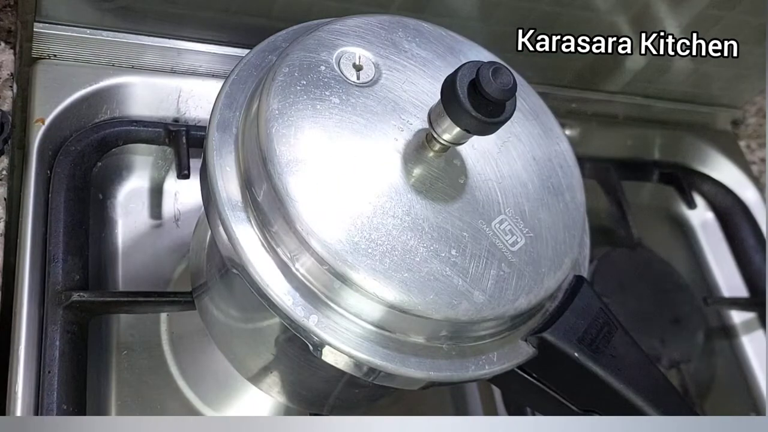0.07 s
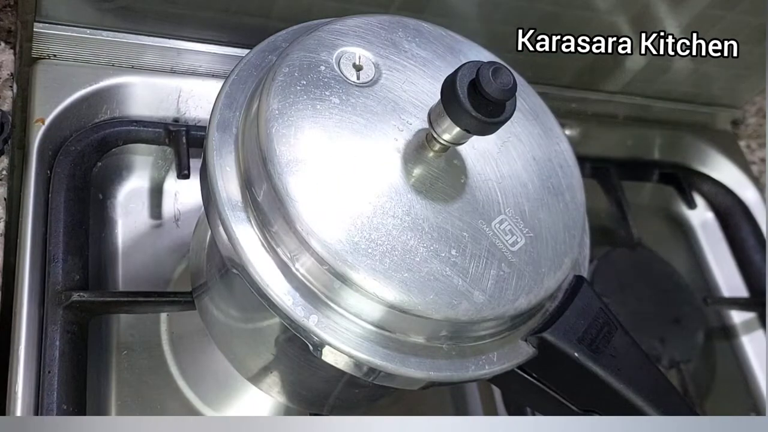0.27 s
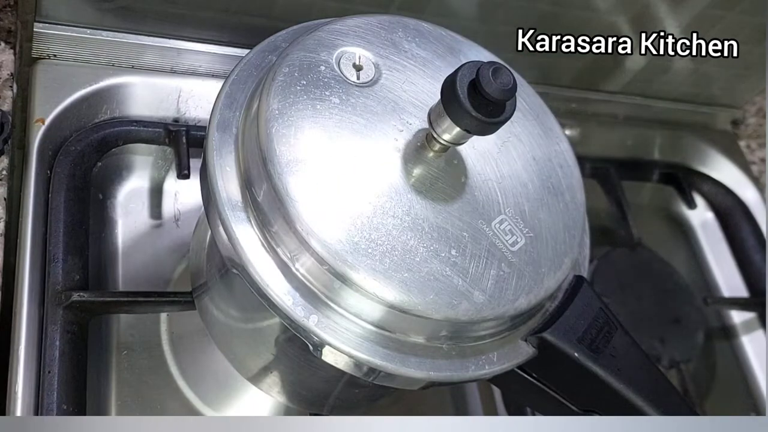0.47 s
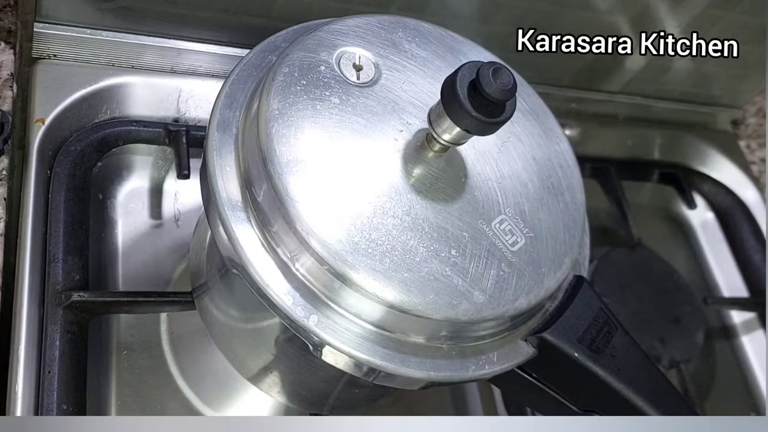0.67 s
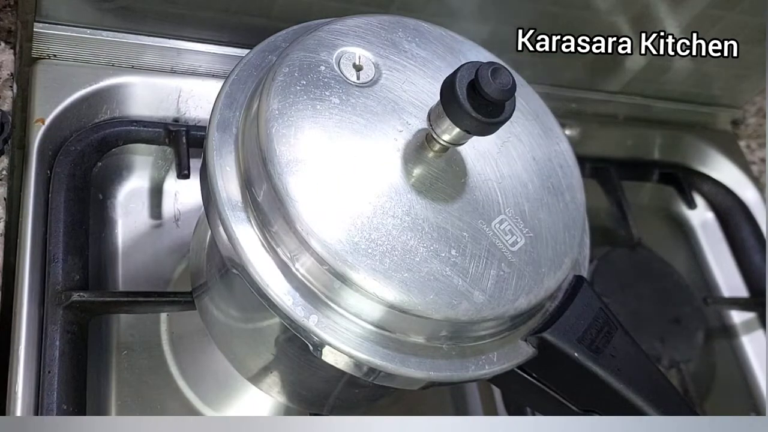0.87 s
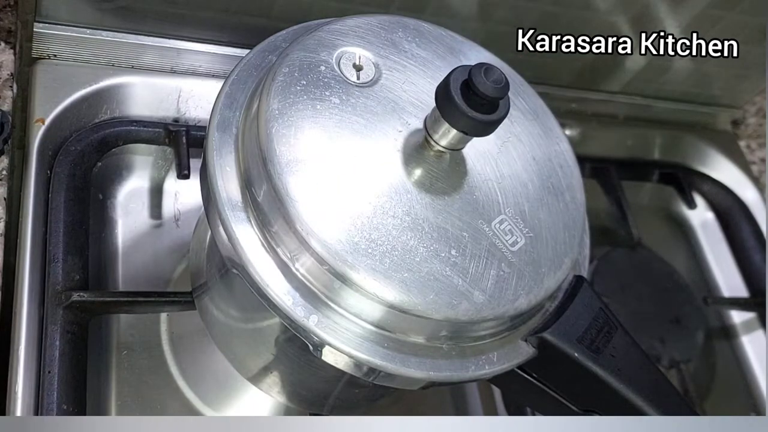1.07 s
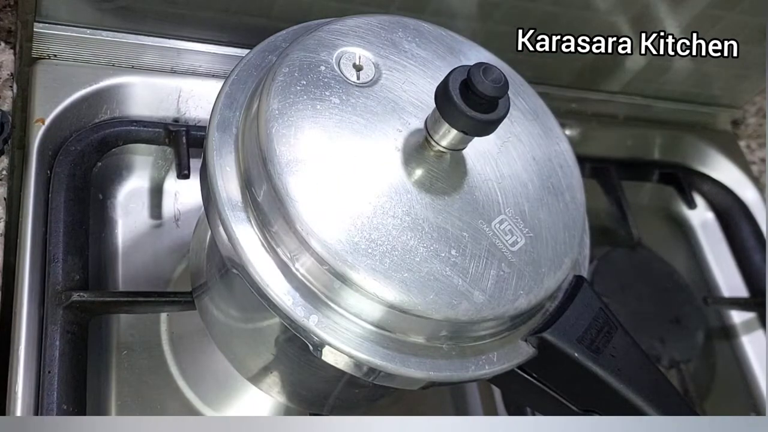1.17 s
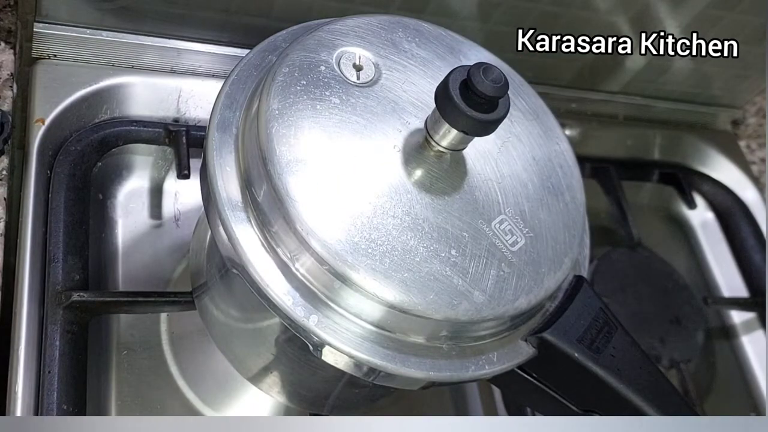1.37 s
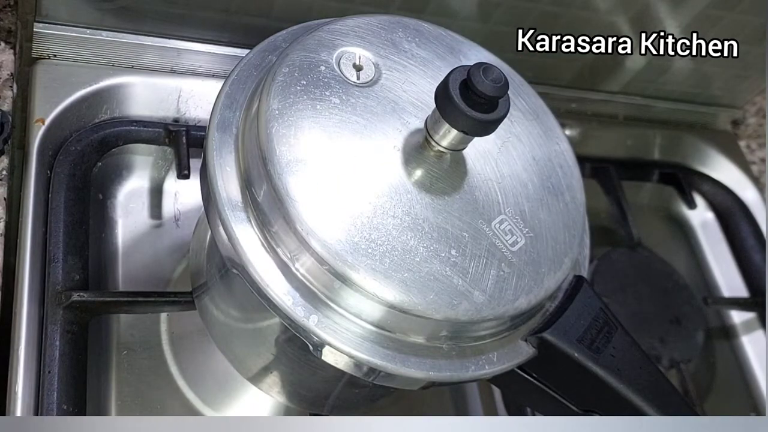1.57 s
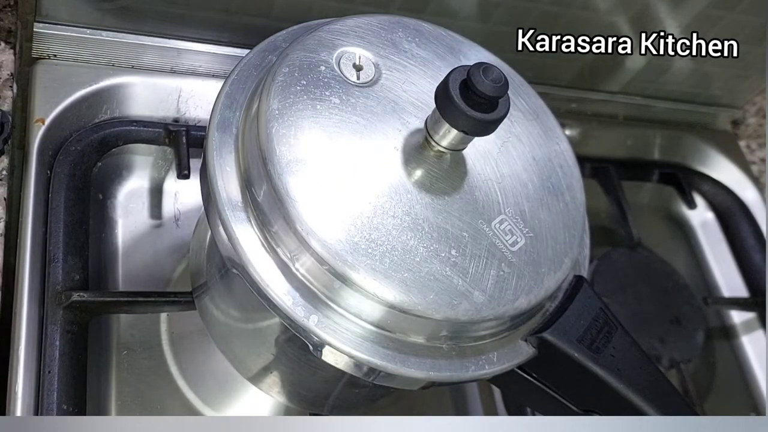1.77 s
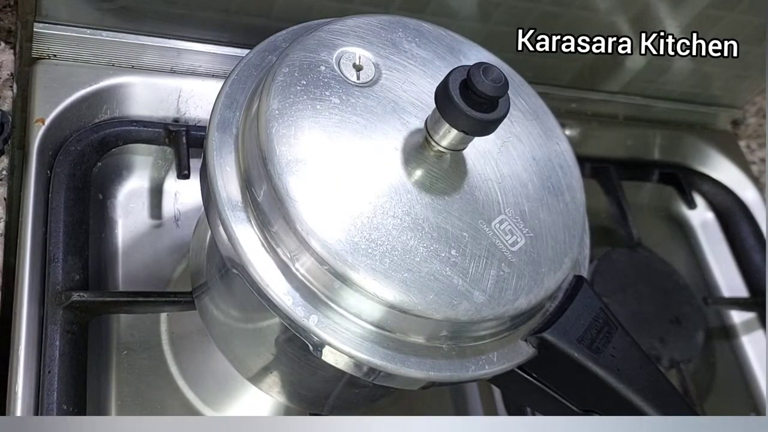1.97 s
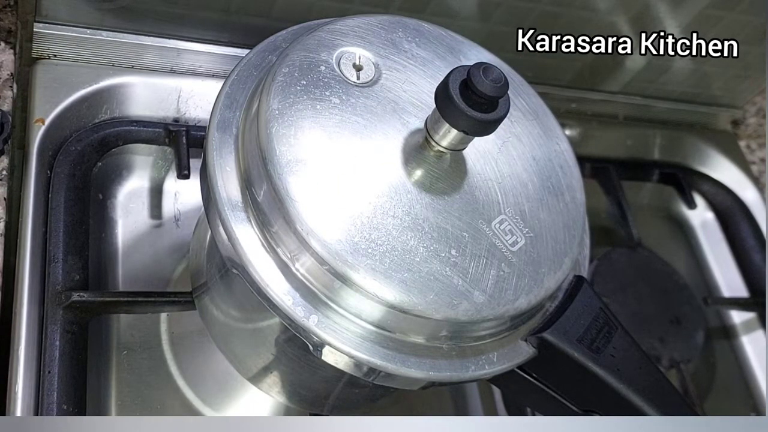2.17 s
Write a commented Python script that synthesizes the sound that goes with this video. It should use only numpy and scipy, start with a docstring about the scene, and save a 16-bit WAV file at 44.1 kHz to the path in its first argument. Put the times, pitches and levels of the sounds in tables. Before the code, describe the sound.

Loud steam jet hisses from a pressure cooker, then the weight clatters down and shuts it off

```python
"""Steam jets from a pressure cooker's vent: wavering whistles in shaped noise, with a few dull pops over it.
Then the weight drops back on its seat, bounces and shuts the jet off: decaying metal modes under gritty noise.
The hard kitchen rings on for a moment, as sparse echoes that die band by band.
A low rumble, mains hum, a faint drone and a thin leak of steam run throughout and stay behind."""
import sys
import numpy as np
from scipy import signal
from scipy.fft import rfft, irfft
from scipy.io import wavfile
from scipy.ndimage import uniform_filter1d

SR = 44100
rng = np.random.default_rng(int(sys.argv[2]) if len(sys.argv) > 2 else 0)


def int16_out(signal):
    """Quantize to a 16-bit WAV file."""
    q = np.round(np.clip(np.atleast_2d(signal).T, -1, 1) * 32767)
    wavfile.write(sys.argv[1], SR, q.astype(np.int16))


N = 97328
LEAD = 22050  # samples of jet before the start, so the room is already full


def gain_of(db):
    """Amplitude factor of a level in dB."""
    return 10 ** (np.asarray(db) / 20)


def evened(x):
    """Scale to rms 1 over the whole array."""
    return x / np.sqrt(np.mean(x ** 2) + 1e-20)


def read(points, hz):
    """Interpolate a (Hz, value) table along log frequency."""
    f, value = np.transpose(points)
    return np.interp(np.log(hz + 1), np.log(f + 1), value)


def curve(rows, t):
    """Interpolate a (seconds, value) table along time."""
    s, value = np.transpose(rows)
    return np.interp(t, s, value)


def add(mix, s, sound):
    """Add a sound at s seconds into mix, cut at its end."""
    part = mix[round(s * SR):][:len(sound)]
    part += sound[:len(part)]


def smoothed_noise(shape, sizes):
    """Gaussian noise averaged over sizes[i] cells along axis i, rms 1."""
    noise = rng.standard_normal(shape)
    for axis, size in enumerate(sizes):
        noise = uniform_filter1d(noise, size=size, axis=axis)
    return evened(noise)


# Strength of the jet until the weight seals the vent. Each row: time in seconds, level in dB.
JET_FLOW = [(0, -22), (.014, -19.5), (.2, -20.5), (.3, -19), (.395, -21.5), (.415, -26), (.456, -19),
            (.5, -20), (.6, -20), (.65, -20), (.79, -19.5), (.87, -21.5), (.94, -22), (1.016, -24),
            (1.045, -32), (1.075, -37)]
# Hiss spectrum. Each row: frequency in Hz, relative power density in dB per Hz.
JET_SPECTRUM = [(180, -51), (300, -24), (404, -32.5), (923, -22.5), (1490, -23.5), (1800, -12.5),
                (2750, -15.5), (3800, -10.5), (4850, -9.5), (5500, -3.5), (6710, -9), (7410, 0),
                (8050, -6.5), (8600, -2.5), (12400, -3), (15600, -6)]
# Whistles in the jet. Each row: frequency in Hz, width in Hz, relative level in dB.
JET_WHISTLES = [(7100, 60, -5), (7420, 90, 1), (8540, 50, 1), (8765, 90, 4), (9120, 60, -1),
                (9870, 120, -1), (10370, 80, -1), (10750, 220, -2), (11700, 70, 0), (12100, 100, 0),
                (12700, 300, -3), (15700, 40, -3)]
SEAL_S, CLOSE_DB_PER_S = 1.094, -900
WAVER_DB, PATCH_DB, FLICKER_DB = 4, 3, 1.75  # rms swings
FULL_DB = -21  # flow level from which sinking is counted
WHISTLE_SINK_DB_PER_DB = .8  # extra whistle loss per dB of sinking
# around LOW_HZ the hiss keeps this share of its level as the flow sinks
LOW_HOLD, LOW_HZ, HOLD_OCTAVES = .82, 2780, .75


def jet(flicker):
    """Turbulent hiss with wavering whistles, drifting spectral patches and a fast level flicker."""
    size = N + LEAD
    frames, hz = size // 256 + 5, np.fft.rfftfreq(1024, 1 / SR)
    real, imag = rng.standard_normal((2, 513, frames))
    patches = smoothed_noise((513, frames), (12, 14))
    waver = smoothed_noise((frames, len(JET_WHISTLES)), (1, 10)).T

    power = gain_of(2 * read(JET_SPECTRUM, hz))[:, None] * np.ones(frames)
    frame_s = (np.arange(frames) * 256 - LEAD) / SR
    sunk_db = FULL_DB - curve(JET_FLOW, frame_s)
    whistle_loss_db = WHISTLE_SINK_DB_PER_DB * np.maximum(sunk_db, 0)
    for (whistle_hz, width_hz, db), w in zip(JET_WHISTLES, waver):
        shape = 1 / (1 + (2 * (hz - whistle_hz) / width_hz) ** 2) ** 2
        power += shape[:, None] * gain_of(2 * (db + WAVER_DB * w - whistle_loss_db))
    octaves = np.log2((hz[:, None] + 1) / LOW_HZ)
    power *= gain_of(2 * LOW_HOLD * sunk_db / (1 + (octaves / HOLD_OCTAVES) ** 2))

    cells = (real + 1j * imag) * np.sqrt(power) * gain_of(PATCH_DB * patches)
    hiss = signal.istft(cells, nperseg=1024, noverlap=768)[1][:size]
    t = (np.arange(size) - LEAD) / SR
    closing_db = CLOSE_DB_PER_S * np.maximum(t - SEAL_S, 0)
    return evened(hiss) * gain_of(curve(JET_FLOW, t) + closing_db + FLICKER_DB * flicker)


# Decay of the room. Each row: frequency in Hz, t60 in seconds.
ROOM_DECAY = [(300, .6), (600, .5), (1000, .42), (3000, .38), (5000, .4), (8000, .39), (11000, .39),
              (15000, .4)]
# Channel balance. Each row: frequency in Hz, left minus right in dB.
CHANNEL_LEAN = [(60, 18), (180, 15), (550, 3.5), (1650, 2), (4970, -0.5), (9000, 2), (15000, -3.5)]
LATE_DB, LATE_STRETCH = -20, 1.8  # a weaker, slower tail from the far end of the room
LEFT_LAG_S, LAG_FROM_HZ = .000535, 2820  # the lag fades out below LAG_FROM_HZ


def kitchen(x, wet_db):
    """Direct sound, a little late on the left, plus a sparse tail that dies band by band."""
    starts = np.arange(60, SR // 2, 20)
    taps = np.zeros((2, SR // 2 + 40))
    at = starts + rng.integers(0, 20, (2, len(starts)))
    np.put_along_axis(taps, at, rng.choice([-1., 1.], at.shape), 1)
    hz, t, cells = signal.stft(taps, SR, nperseg=256)
    fall_db = -60 * t / read(ROOM_DECAY, hz)[:, None]
    decay = np.hypot(gain_of(fall_db), gain_of(LATE_DB + fall_db / LATE_STRETCH))
    tail = signal.istft(cells * decay, SR, nperseg=256)[1]
    tail /= np.linalg.norm(tail, axis=1)[:, None]
    wet = gain_of(wet_db) * signal.fftconvolve(x[None], tail, axes=1)[:, :len(x)]

    f = np.fft.rfftfreq(len(x), 1 / SR)
    lag_s = LEFT_LAG_S / (1 + (LAG_FROM_HZ / (f + 1)) ** 2)
    direct = rfft(x) * np.array([np.exp(-2j * np.pi * f * lag_s), 1 + 0 * f])
    lean = gain_of(read(CHANNEL_LEAN, f) / 2)
    both = (direct + rfft(wet, axis=1)) * np.array([lean, 1 / lean])
    return irfft(both, len(x), axis=1)[:, LEAD:] / np.sqrt(1 + gain_of(2 * wet_db))


def band(hz, width_hz):
    """Noise in a narrow resonance, rms 1."""
    f = np.fft.rfftfreq(N, 1 / SR)
    return evened(irfft(rfft(rng.standard_normal(N)) / (1 + (2 * (f - hz) / width_hz) ** 2), N))


# Spectrum of room tone and leak. Each row: frequency in Hz, relative level in dB.
FLOOR_SPECTRUM = [(12, -40), (20, -23.5), (36, -25), (59, -19), (109, -30), (162, -29), (226, -33.5),
                  (316, -31.5), (383, -43), (500, -44), (650, -49), (790, -44), (900, -53), (1400, -55.5),
                  (2200, -59), (3900, -61.5), (6000, -58.5), (9000, -57), (12500, -56), (14500, -58.5),
                  (15600, -67)]
# Likeness of the channels. Each row: frequency in Hz, left-right correlation from -1 to 1.
CHANNEL_LIKENESS = [(60, 0.88), (150, 0.79), (380, 0.34), (950, 0.47), (2380, 0.43), (5980, -0.41),
                    (15000, -0.12)]
# Deep rumble. Each row: time in seconds, level in dB.
RUMBLE_LEVEL = [(0.0, -59.5), (0.59, -41.5), (0.65, -51), (0.85, -60), (0.88, -49), (1.0, -59), (1.13, -46),
                (1.38, -50.5), (1.48, -54.5), (1.5, -50), (1.89, -54), (1.92, -65.5), (1.97, -48),
                (2.11, -63), (2.16, -48.5), (2.2, -53)]
FLOOR_DB, DRIFT_DB = -55.5, .7
RUMBLE_HZ, RUMBLE_WANDER_HZ = 54.7, 3.4
HUM_HZ, HUM_DB = 100.4, -57.5
DRONE_HZ, DRONE_WIDTH_HZ, DRONE_DB = 222.9, 27, -64


def background():
    """Room tone and leak hiss, with rumble, hum and a faint drone nearly alike in both channels."""
    hz, t = np.fft.rfftfreq(N, 1 / SR), np.arange(N) / SR
    left, other = rfft(rng.standard_normal((2, N)), axis=1)
    same = np.clip(read(CHANNEL_LIKENESS, hz), -1, 1)
    right = same * left + np.sqrt(1 - same ** 2) * other
    spectra = np.array([left, right]) * gain_of(read(FLOOR_SPECTRUM, hz))
    f, s, cells = signal.stft(evened(irfft(spectra, N, axis=1)), SR, nperseg=1024)
    drift = smoothed_noise((len(f), len(s)), (40, 9))
    tone = signal.istft(cells * gain_of(DRIFT_DB * drift), SR, nperseg=1024)[1][:, :N]

    phase = 2 * np.pi * np.cumsum(RUMBLE_HZ + RUMBLE_WANDER_HZ * band(0, 8)) / SR
    rumble = gain_of(curve(RUMBLE_LEVEL, t)) * np.cos(phase)
    hum = gain_of(HUM_DB) * np.sin(2 * np.pi * HUM_HZ * t)
    low = np.sqrt(2) * (rumble + hum) * gain_of([[-.5], [.5]])  # right 1 dB louder
    drone = gain_of(DRONE_DB) * band(DRONE_HZ, DRONE_WIDTH_HZ)
    return gain_of(FLOOR_DB) * tone + low + drone


# Short dull pops. Each row: time in seconds, level in dB.
POP_TIMES = [(.181, -49), (.404, -52), (.523, -55), (.632, -51), (.711, -51), (.794, -45), (1.240, -47)]
POP_S = .00042
SNAP_S, SNAP_DB = .00009, -9  # the sharp edge of each pop


def pops():
    """One soft pressure pulse each, with a sharper edge, alike in both channels."""
    out, u = np.zeros(N), np.arange(-200, 200) / SR / POP_S
    pulse = (u ** 2 - 1) * np.exp(-u ** 2 / 2)
    edge = u * POP_S / SNAP_S
    snap = gain_of(SNAP_DB) * edge * np.exp(-edge ** 2 / 2)
    for s, db in POP_TIMES:
        add(out, s - 200 / SR, gain_of(db) * (pulse + snap))
    return out


# The weight landing and bouncing. Each row: time in seconds, level in dB, tilt in dB per octave.
LANDINGS = [(1.056, -50, -4), (1.077, -45, -2), (1.082, -33, 1), (1.089, -37, 0), (1.095, -38, 2),
            (1.111, -36, -1), (1.117, -42, 0), (1.129, -45, 0), (1.145, -46, 1), (1.158, -51, 0),
            (1.175, -54, -2), (1.194, -52, 0), (1.218, -56, 2)]
# Modes of weight and lid. Each row: frequency in Hz, relative level in dB, t60 in seconds.
METAL_MODES = [(865, -13, .04), (935, -11, .06), (1350, -15, .04), (1480, -12, .05), (1840, -10, .035),
               (2470, -2, .045), (2590, -6, .04), (2800, -15, .03), (3700, -14, .05), (4800, -8, .06),
               (5110, -4, .035), (5400, -6, .03), (5600, 2, .055), (5780, -6, .03)]
MODE_SPREAD_DB, TILT_PIVOT_HZ = 1.8, 2500
GRIT_DB, GRIT_T60_S = -4, .09
SCRAPE_S = .0004  # rise time constant


def weight():
    """Each landing rings the same metal modes, duller or brighter, under a short gritty rattle."""
    out, t = np.zeros(N + LEAD), np.arange(6000) / SR
    b, a = signal.butter(1, [350, 4000], "bandpass", fs=SR)
    for s, db, tilt_db in LANDINGS:
        ring = np.zeros(len(t))
        for hz, mode_db, t60_s in METAL_MODES:
            start_db = mode_db + tilt_db * np.log2(hz / TILT_PIVOT_HZ) + MODE_SPREAD_DB * rng.standard_normal()
            phase = rng.uniform(0, 2 * np.pi)
            ring += gain_of(start_db - 60 * t / t60_s) * np.sin(2 * np.pi * hz * t + phase)
        rattle = signal.lfilter(b, a, rng.standard_normal(len(t)))
        grit = rattle * gain_of(GRIT_DB - 60 * t / GRIT_T60_S)
        onset = 1 - np.exp(-t / SCRAPE_S)
        add(out, s + LEAD / SR, gain_of(db) * onset * (ring + grit))
    return out


EDDIES = 3  # unrelated parts of the plume, each with its own echoes
STEAM_WET_DB, CLACK_WET_DB = 1.5, -10  # echoes relative to direct sound


def scene():
    """Steam and weight in the kitchen, with pops and background; all eddies share one flicker."""
    flicker = smoothed_noise(N + LEAD, (90,))
    steam = sum(kitchen(jet(flicker), STEAM_WET_DB) for _ in range(EDDIES)) / np.sqrt(EDDIES)
    return steam + kitchen(weight(), CLACK_WET_DB) + pops() + background()


EDGE_HZ = 15750


def record(dry):
    """Steep linear-phase low-pass that removes the treble above EDGE_HZ."""
    lowpass = signal.firwin(1023, EDGE_HZ, window=("kaiser", 10), fs=SR)
    return signal.oaconvolve(dry, lowpass[None], "same")


dry = scene()
out = record(dry)
int16_out(out)
```